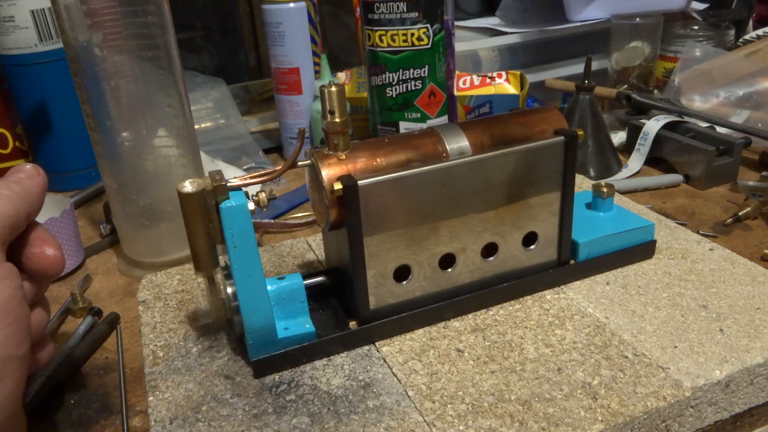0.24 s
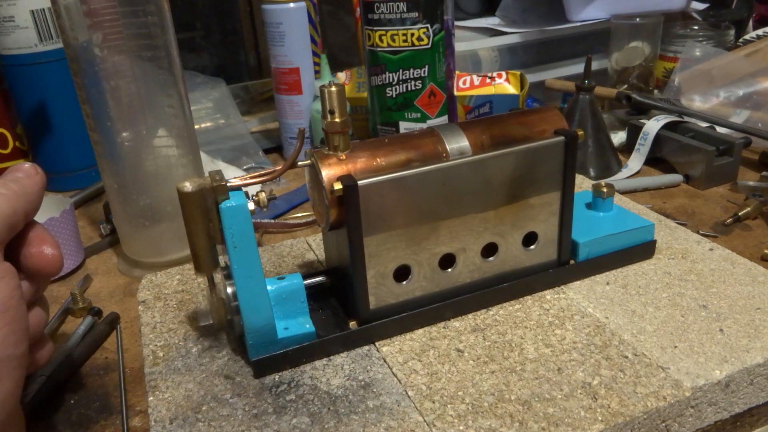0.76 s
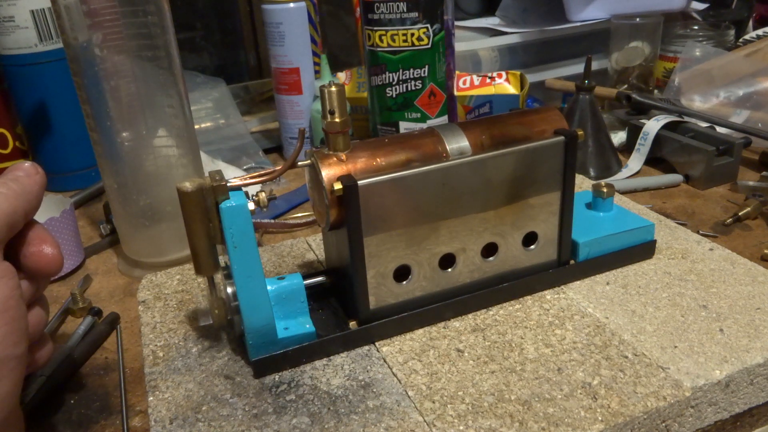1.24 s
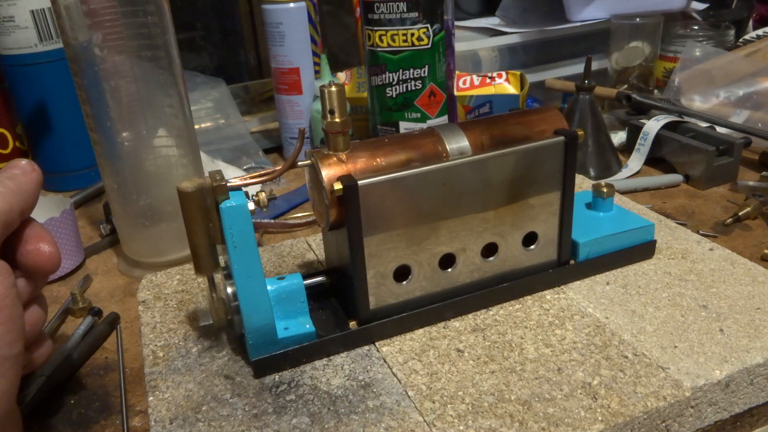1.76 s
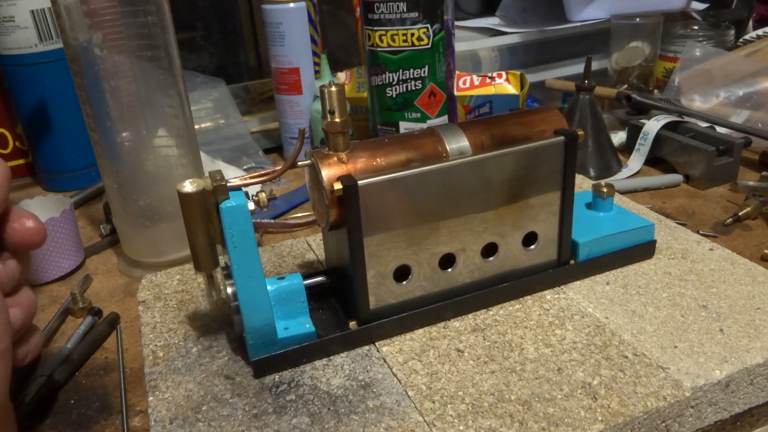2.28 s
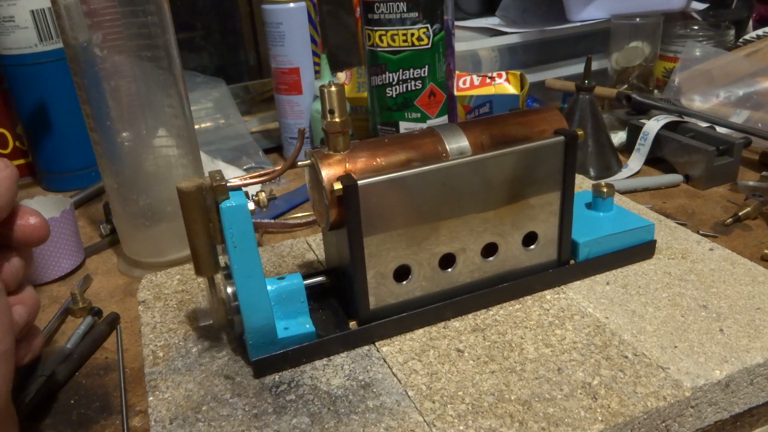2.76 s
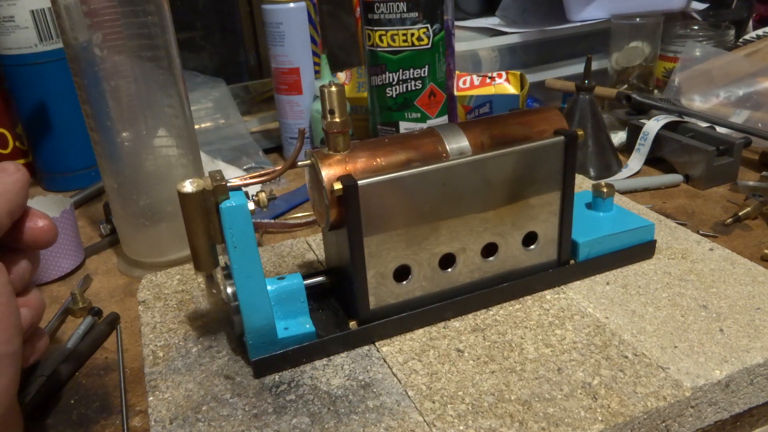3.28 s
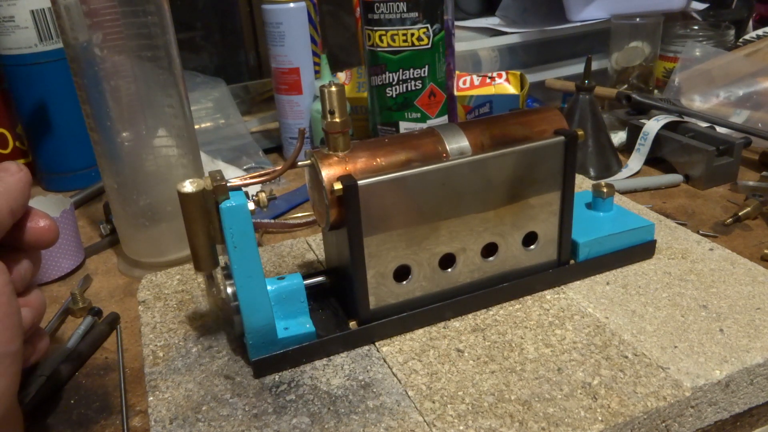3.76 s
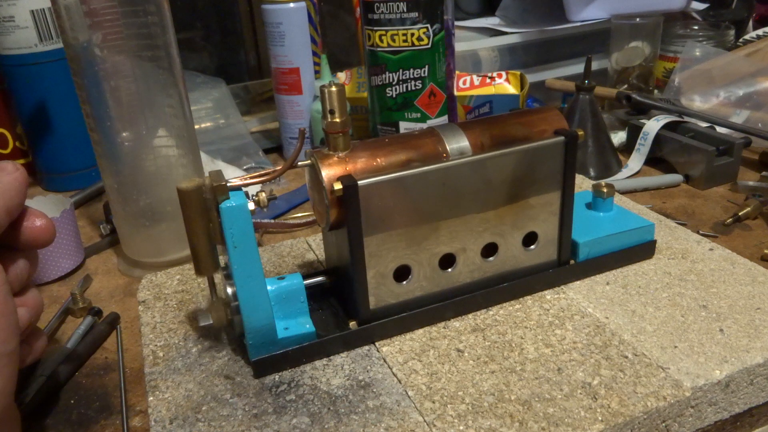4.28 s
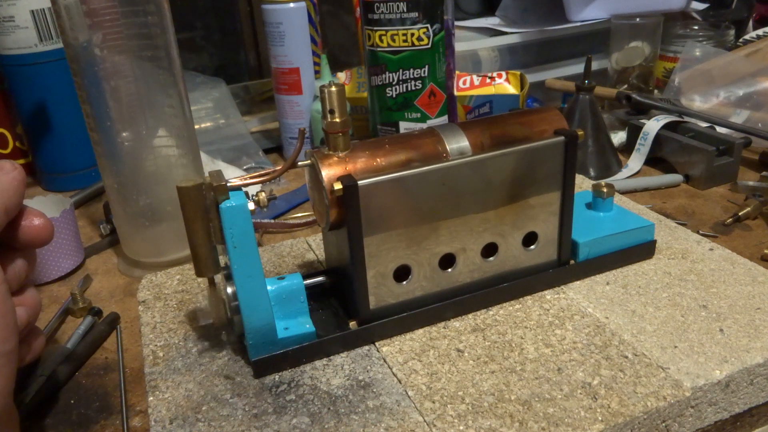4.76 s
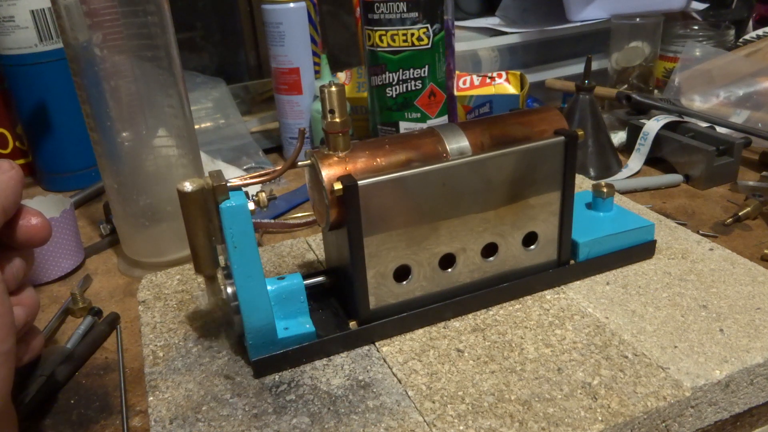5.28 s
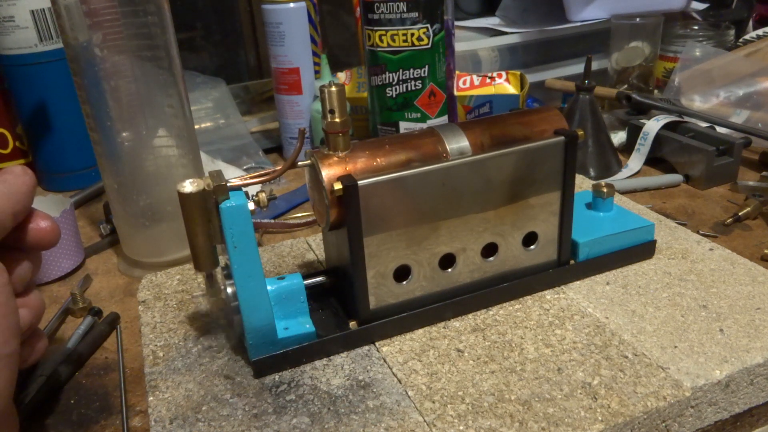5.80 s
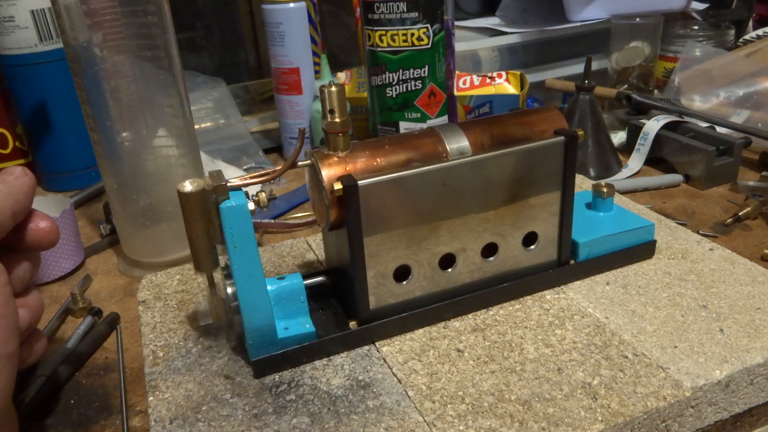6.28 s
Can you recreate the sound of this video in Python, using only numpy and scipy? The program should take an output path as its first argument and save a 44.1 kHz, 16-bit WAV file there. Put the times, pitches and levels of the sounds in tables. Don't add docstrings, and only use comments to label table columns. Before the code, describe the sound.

A small model steam engine chuffs very fast with crisp hissing puffs and metallic knocks, slows, chokes on water, then puffs slower, longer and wetter.

```python
import sys
import numpy as np
from scipy import signal
from scipy.fft import rfft, irfft, next_fast_len
from scipy.io import wavfile
from scipy.ndimage import uniform_filter1d

SR = 44100
rng = np.random.default_rng(int(sys.argv[2]) if len(sys.argv) > 2 else 0)


def pcm_store(signal):
    levels = np.round(np.clip(np.atleast_2d(signal), -1, 1) * 32767)
    wavfile.write(sys.argv[1], SR, levels.astype(np.int16).T)


def nominal_scale(level):
    x = np.asarray(level, float) / 20
    return 10 ** x


N = 288414

# t/s, speed/(turns per s)
SPEED = [(0, 16.18), (1.3, 16.25), (1.9, 14.89), (2.6, 13.11), (3.2, 12.85), (3.6, 12.25), (3.95, 12.46),
         (4.1, 10.2), (4.3, 9.04), (4.7, 7.57), (5.1, 7.03), (5.4, 7.29), (6.1, 7.7), (6.54, 8.56)]
START_TURN = 0.18


def shaft():
    return START_TURN + np.cumsum(over_time(SPEED)) / SR


def moment(turn):
    return np.interp(turn, shaft(), np.arange(N) / SR)


# t/s, clank level/dB, frame level/dB
SLACK = [(0, -35, -47), (.4, -38, -37.5), (.9, -36, -43), (1.15, -36.5, -39), (1.35, -41.5, -37.5),
         (1.8, -43.5, -34.5), (2.15, -44.5, -30.5), (2.6, -48.5, -37), (3.3, -43, -37.5),
         (3.9, -48.5, -38.5), (4.1, -47, -39), (4.35, -48, -34.5), (4.8, -51, -38.5), (5.2, -73, -37),
         (5.7, -56.5, -39), (6.1, -46, -39.5), (6.3, -55, -33.5), (6.54, -51, -38)]
UNEVEN_BLOW_DB = 1
BRASS_DB, BRASS_FOLLOWS = -34.5, 0.47

# t/s, jet level/dB
PRESSURE = [(0, -31.5), (.4, -33), (1, -31.5), (2.5, -32), (3.1, -30.5), (3.9, -30.5)]
# t/s, jet level/dB, length/s, sag/dB, pipe share/dB
SLUGS = [
    (4.036, -29.5, 0.02, -2, -3.3),
    (4.098, -26.5, 0.043, -10, -13),
    (4.186, -27, 0.085, -11.5, -10.5),
    (4.297, -28, 0.037, -1.5, -8.5),
    (4.351, -36, 0.022, -2, 3),
]
# port opens t/s, jet level/dB, length/s
WET_PUFFS = [(4.408, -28.5, 0.058), (4.528, -25, 0.056), (4.652, -24, 0.068), (4.783, -26.5, 0.071),
             (4.92, -27, 0.069), (5.062, -25.5, 0.066), (5.199, -23.5, 0.072), (5.337, -26.5, 0.068),
             (5.478, -27, 0.059), (5.614, -28, 0.061), (5.75, -26.5, 0.067), (5.88, -26.5, 0.071),
             (6.013, -26, 0.061), (6.142, -27, 0.06), (6.267, -27, 0.058), (6.388, -28, 0.064),
             (6.512, -27.5, 0.046)]
DRY_TURNS = 58
PORT_LAG_TURN = 0.14
OPEN_TURN, OPEN_LOSS_S = 0.6, 0.017
SAG_DB, SAG_DB_PER_S, WET_SAG_DB = -0.5, -91, -6
DRY_PIPE_DB, WET_PIPE_DB = -9, -13.5
UNEVEN_JET_DB, UNEVEN_PIPE_DB, UNEVEN_LENGTH = 1.14, 2.1, 0.092


def puffs():
    s = moment(np.arange(DRY_TURNS) + PORT_LAG_TURN)
    luck = rng.standard_normal((DRY_TURNS, 3))
    open_s = OPEN_TURN / np.interp(s, *np.transpose(SPEED)) - OPEN_LOSS_S
    length = open_s * np.exp(UNEVEN_LENGTH * luck[:, 0])
    jet_db = np.interp(s, *np.transpose(PRESSURE)) + UNEVEN_JET_DB * luck[:, 1]
    sag_db = SAG_DB + SAG_DB_PER_S * length
    pipe_db = DRY_PIPE_DB + UNEVEN_PIPE_DB * luck[:, 2]
    dry_puffs = np.transpose([s, jet_db, length, sag_db, pipe_db])
    wet_puffs = [(s, db, length, WET_SAG_DB, WET_PIPE_DB) for s, db, length in WET_PUFFS]
    rows = np.vstack([dry_puffs, SLUGS, wet_puffs])
    at, clank_db, _ = np.transpose(SLACK)
    uneven_db = UNEVEN_BLOW_DB * rng.standard_normal(len(rows))
    return np.column_stack([rows, np.interp(rows[:, 0], at, clank_db) + uneven_db])


# f/Hz, level/dB per Hz
JET = [(2120, -70), (3600, -12), (4110, -3.5), (4660, -8), (5130, -1), (6250, -6), (7260, 1), (9190, -3.5),
       (10000, 2), (11100, -25), (14400, -33), (22000, -120)]
# f/Hz, width/Hz, level/dB
JET_RINGS = [(5920, 140, -2.5), (7030, 710, -2), (8450, 330, -3), (10140, 740, 4), (10750, 190, 2.5)]
# f/Hz, width/Hz, level/dB
PIPE = [(324, 370, -10.5), (692, 210, -12), (1414, 356, -5), (2555, 690, -4), (2914, 280, 2),
        (3430, 250, -2.5)]
SLOWEST_OPENING_S = 0.02


def exhaust(strokes):
    jet_flow, pipe_flow = np.zeros((2, N))
    for s, db, length, sag_db, pipe_db, _ in strokes:
        t = np.arange(0, length + 0.035, 1 / SR)
        rise_s = min(6.9 * length ** 2, SLOWEST_OPENING_S)
        opening = np.clip(t / rise_s, 0, 1) ** (21 * length)
        shut_db = -19 / length * np.maximum(t - 0.87 * length, 0)
        flow = opening * nominal_scale(db + 0.5 + 2 * sag_db * (t / length - 0.352) + shut_db)
        add(jet_flow, s - 0.002, flow)
        add(pipe_flow, s + 0.0012, flow * nominal_scale(pipe_db - 1.26 * sag_db * t / length))
    sputter_db = 2.1 * np.tanh(flutter(390)) + 0.64 * flutter(78)
    hiss = coloured(lambda hz: nominal_scale(read(JET, hz)))
    for hz, width, db in JET_RINGS:
        ring = coloured(lambda f: peaks_gain([(hz, width, 0)], f))
        hiss += 0.3 * nominal_scale(db + 3.2 * flutter(60)) * ring
    pipe = coloured(lambda hz: peaks_gain(PIPE, hz) + 0.13 * (hz < 5000) * (hz > 1000))
    drops = rng.random(N) < 900 / SR
    crackle = nominal_scale(7.6 * np.minimum(rng.exponential(1, N), 2)) * drops
    crackle = signal.lfilter(*signal.butter(2, [0.25, 0.49], "band"), crackle)
    jet = evened(hiss) * nominal_scale(sputter_db) + 0.32 * evened(crackle)
    lower = signal.filtfilt(*signal.butter(2, 0.32), jet)
    lagging = signal.lfilter([0.006], [1, 0.006 - 1], jet_flow)
    gurgle_db = 0.5 * sputter_db + 2.2 * np.tanh(flutter(70)) * 1.4
    return jet_flow * (jet - lower) + lagging * lower + pipe_flow * pipe * nominal_scale(gurgle_db)


def knocks():
    s = moment(np.arange(1, int(shaft()[-1]) + 1))
    at, _, frame_db = np.transpose(SLACK)
    luck = UNEVEN_BLOW_DB * rng.standard_normal((len(s), 2))
    db = np.interp(s, at, frame_db) + luck[:, 0]
    brass_db = BRASS_DB + BRASS_FOLLOWS * (db + 35.5) + luck[:, 1]
    return np.transpose([s, db, brass_db - db])


# t/s, f/Hz
FRAME_HZ = [(0, 1575), (2.05, 1551), (2.57, 1473), (2.65, 1493), (3.7, 1496), (5, 1525), (5.87, 1510),
            (6.1, 1490), (6.5, 1550)]
# f/Hz, level/dB, t60/s
BRASS = [(3225, 8, 0.028), (4540, 1, 0.013), (4796, 18.5, 0.013), (5680, 11.5, 0.031), (5857, 17, 0.017),
         (6150, 18.5, 0.0074), (6800, -14, .012)]
# f/Hz, level/dB, t60/s
CLANK = [(1725, -3, 0.065), (1233, -16.5, 0.082), (3204, -1.5, 0.04), (5900, -2, 0.028)]


def crank(blows, strokes):
    out = np.zeros(N)
    luck = rng.standard_normal((len(blows), 900))
    for (s, db, brass_db), contacts in zip(blows, luck):
        hz = np.interp(s, *np.transpose(FRAME_HZ))
        frame = np.array([(hz, 0, 0.04), (1700, -9, 0.04), (1380, -8, 0.04), (1200, -15, 0.05)])
        frame[:, 1] += 1.3 * contacts[:len(frame)]
        frame[:, 0] *= 1 + 0.011 * contacts[-len(frame):]
        add(out, s - 0.009, nominal_scale(db) * swell(frame, 0.013))
        add(out, s + 0.008, nominal_scale(db - 9) * swell(frame, 0.0063))
        add(out, s - 0.011, nominal_scale(db + brass_db) * rattle(BRASS, contacts, 0.0064))
    luck = rng.standard_normal((len(strokes), len(CLANK), 2))
    for row, uneven in zip(strokes, luck):
        s, clank_db = row[0], row[5]
        modes = [(hz * (1 + 0.0065 * a), db + 0.62 * b, t60) for (hz, db, t60), (a, b) in zip(CLANK, uneven)]
        add(out, s - 0.002, nominal_scale(clank_db + 4.5) * swell(modes, 0.0052))
        add(out, s - 0.017, nominal_scale(clank_db - 6.5) * swell(modes[:1], 0.0072))
    return out


# t/s, level/dB
SPITS = [(0.141, -22), (0.943, -26), (0.9586, -23.5), (0.965, -22), (1.0124, -17), (1.69, -24),
         (2.366, -27), (2.834, -26), (2.9863, -25.5), (3.496, -23.5), (3.643, -20.5), (4.057, -20),
         (4.1426, -20), (4.251, -16.5), (4.258, -19), (4.3687, -34), (4.59, -21.5), (4.6023, -24),
         (4.7363, -23.5), (4.9333, -25), (5.2078, -26), (5.9558, -21), (5.9613, -19)]
SPIT_HZ, SPIT_SPREAD = 2950, 0.03
# t/s, level/dB, f/Hz
BURSTS = [(1.0119, -27.5, 5470), (1.7366, -23, 10400), (2.077, -25, 10500), (2.8176, -23, 10500),
          (2.892, -30, 9400), (3.4413, -20, 10440), (4.0575, -21.5, 6800), (4.2156, -20, 9700),
          (4.2973, -15.5, 9900), (4.3592, -25, 4770), (4.4203, -26, 7260), (4.9752, -14, 10480),
          (5.084, -16.5, 5900), (5.1073, -18, 9800), (5.365, -21, 5670), (5.3952, -19.5, 10500),
          (5.501, -19.5, 5500), (5.5314, -13.5, 10200), (5.6312, -14, 10200), (5.665, -17.5, 9970),
          (5.9561, -31, 7400), (6.2844, -18.5, 9880), (6.5274, -20, 9400)]


def droplets():
    out, t = np.zeros(N), np.arange(400) / SR
    spread = 1 + SPIT_SPREAD * rng.standard_normal(len(SPITS))
    drops = [(s, db, SPIT_HZ * k) for (s, db), k in zip(SPITS, spread)] + list(BURSTS)
    ticks = rng.standard_normal((len(drops), 400))
    for (s, db, hz), tick in zip(drops, ticks):
        rise_s = 0.0011 if hz > 5000 else 0.0007
        wander = 0.00051 * hz * np.cumsum(tick) / 20
        body = t / rise_s * np.exp(1 - t / rise_s) * np.sin(2 * np.pi * hz * t + wander)
        tick_share = 0.15 if hz > 8000 else 0.5
        add(out, s - rise_s, nominal_scale(db - 1.0) * (body + tick_share * tick * np.exp(-t / 0.0035)))
    return signal.lfilter(*signal.butter(2, 0.07, "high"), out)


# order, loudest t/s, lasts/s, level/dB
ORDERS_HEARD = [(8, 1.25, 0.48, -59), (23, 1.5, 0.26, -55.5), (38, 1.62, 0.45, -61),
                (11, 2.15, 0.33, -60.5), (14, 3.5, 0.96, -63), (43, 3.15, 0.4, -57)]


def whirr():
    t, turns = np.arange(N) / SR, shaft()
    out = np.zeros(N)
    for order, s, lasts, db in ORDERS_HEARD:
        level_db = db + 1.5 + 3.6 * flutter(14) - 9.5 * ((t - s) / lasts) ** 2
        out += nominal_scale(level_db) * np.sin(2 * np.pi * round(order) * turns)
    return out


# t/s, upper modes level/dB, lower modes level/dB
SHAKE = [(0.0, -45, -59.5), (0.87, -49, -55), (1.18, -41, -52.5), (1.27, -49.5, -61), (1.99, -52, -52),
         (4.41, -51, -58), (5.61, -61.5, -66), (6.3, -48.5, -60), (6.49, -58, -53), (6.54, -48, -57)]
# f/Hz, level/dB, t60/s
BENCH_HIGH = [(258.3, -6, 0.7), (366, -6, 0.11), (397.7, 4.5, 0.15), (462, 2.5, 0.13), (526.5, 5, 0.1),
              (635, 1.5, 0.076)]
# f/Hz, level/dB, t60/s
BENCH_LOW = [(122.4, -7, 0.26), (159, 8.5, 0.15), (180.2, 3, 0.82)]
# t/s, level/dB
DRONE = [
    (5.15, -89),
    (5.4, -58),
    (5.65, -57),
    (5.9, -78),
]


def bench():
    thumps = (np.diff(np.floor(shaft()), prepend=0) > 0) * nominal_scale(0.67 * rng.standard_normal(N))
    thumps[1100:] += 0.5 * thumps[:-1100]
    s, high_db, low_db = np.transpose(SHAKE)
    out = nominal_scale(over_time(DRONE) + 1.8 * flutter(8)) * np.sin(2 * np.pi * 66 * np.arange(N) / SR)
    for db, modes in ((high_db, BENCH_HIGH), (low_db, BENCH_LOW)):
        ringing = signal.fftconvolve(thumps, swell(modes, 0.0063, size=14000))[:N]
        steady = ringing / np.sqrt(uniform_filter1d(ringing ** 2, size=12000) + 1e-9)
        out += nominal_scale(over_time(np.transpose([s, db])) - 3.0) * steady
    return out


# f/Hz, t60/s
ROOM = [(300, 0.086), (10000, 0.054)]


def workshop(x):
    taps = np.zeros((2, SR // 2))
    at = np.arange(160, SR // 2 - 20, 20)
    at = at + rng.integers(0, 20, (2, len(at)))
    np.put_along_axis(taps, at, rng.choice([-1., 1.], at.shape), 1)
    hz, t, z = signal.stft(taps, SR, nperseg=256)
    tail = signal.istft(z * nominal_scale(-60 * t / read(ROOM, hz)[:, None]), SR, nperseg=256)[1]
    return signal.fftconvolve(x[None], tail / np.linalg.norm(tail[0]), axes=1)[:, :N]


# t/s, level/dB
LEAK = [(0.0, -40), (4.55, -40.5), (4.84, -43), (6.54, -44)]
# f/Hz, level/dB per Hz
AIR = [(24, -46), (40, -13), (153, 0.5), (318, -3), (394, 0.5), (646, -3), (857, -8.5), (1510, -2),
       (2000, -8.5), (2850, -5.5), (3700, -10), (5790, -8), (8850, -9.5), (10400, -9), (11200, -16),
       (14600, -41), (22000, -120)]
RUMBLE_DB = -51.5
# f/Hz, likeness/(0 to 1)
SAME = [(60, 0.98), (170, 0.78), (490, 0.46), (1410, 0.22), (4020, 0.83), (11500, 0.67)]


def air():
    hz = np.fft.rfftfreq(1024, 1 / SR)
    a, b, c, d, patches = rng.standard_normal((N // 256 + 5, 513, 5)).T
    patches = uniform_filter1d(uniform_filter1d(patches, size=10, axis=0), size=10, axis=1)
    same = np.clip(read(SAME, hz), -1, 1)[:, None]
    left = a + 1j * b
    right = same * left + np.sqrt(1 - same ** 2) * (c + 1j * d)
    z = np.array([left, right]) * nominal_scale(read(AIR, hz)[:, None] + 2.22 * evened(patches))
    low = 1 / (1 + (hz[:, None] / 900) ** 8)
    rumble, leak = (evened(signal.istft(z * g, nperseg=1024, noverlap=768)[1][:, :N]) for g in (low, 1 - low))
    return nominal_scale(RUMBLE_DB + 1.0) * rumble + nominal_scale(over_time(LEAK) - 2.5) * leak


def swell(modes, rise_s, size=4000):
    t = np.arange(size) / SR
    sound = sum(nominal_scale(db - 60 * t / t60) * np.sin(2 * np.pi * hz * t) for hz, db, t60 in modes)
    sound *= np.sin(np.pi / 2 * np.clip(t / rise_s, 0, 1)) ** 2
    return sound / np.sqrt(uniform_filter1d(sound ** 2, size=200).max())


def rattle(modes, luck, scrape_s):
    t = np.arange(len(luck)) / SR
    scrape = luck * abs(luck) * np.exp(-((t - 0.01) / scrape_s) ** 2)
    sound = signal.fftconvolve(swell(modes, 0.00021, size=1500), scrape)
    return sound / np.sqrt(uniform_filter1d(sound ** 2, size=200).max())


def flutter(top_hz):
    return coloured(lambda hz: 1 / (1 + (hz / top_hz) ** 2))


def coloured(gain):
    size = next_fast_len(N)
    spectrum = rfft(rng.standard_normal(size)) * gain(np.fft.rfftfreq(size, 1 / SR))
    return evened(irfft(spectrum, size)[:N])


def peaks_gain(modes, hz):
    return np.sqrt(sum(nominal_scale(db) ** 2 / (1 + (2 * (hz - f) / width) ** 2) ** 2 for f, width, db in modes))


def evened(x):
    return x / np.sqrt(np.mean(x ** 2) + 1e-20)


def read(points, hz):
    f, value = np.transpose(points)
    return np.interp(np.log(hz + 1), np.log(f + 1), value)


def over_time(rows):
    return np.interp(np.arange(N) / SR, *np.transpose(rows))


def add(mix, s, sound):
    part = mix[max(round(s * SR), 0):][:len(sound)]
    part += sound[:len(part)]


# t/s, left minus right level/dB
PAN = [(0.0, 0.5), (6.54, 1)]


def scene():
    strokes = puffs()
    engine = exhaust(strokes) + crank(knocks(), strokes) + droplets() + bench() + whirr()
    pan_db = over_time(PAN) / 2
    direct = engine * nominal_scale(np.array([pan_db, -pan_db]))
    return direct + nominal_scale(-12.5) * workshop(engine) + air()


def top_cut(x):
    return signal.sosfilt(signal.butter(12, 12100, fs=SR, output="sos"), x)


def record(dry):
    dip = dry - 0.48 * signal.lfilter(*signal.iirpeak(870, 3.5, SR), dry)
    edge = signal.firwin(801, 11200, window=("kaiser", 8), fs=SR)
    return top_cut(signal.oaconvolve(dip, edge[None], "same"))


dry = scene()
out = record(dry)
pcm_store(out)
```